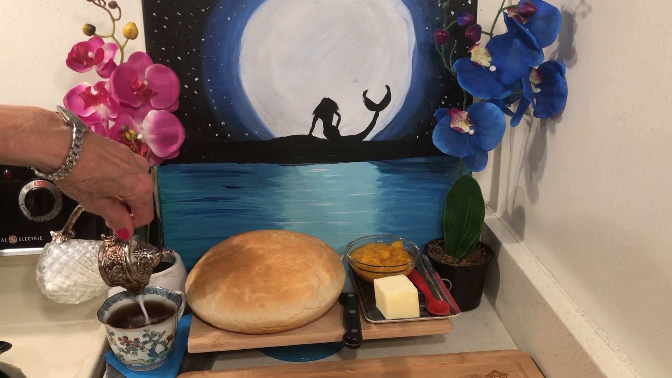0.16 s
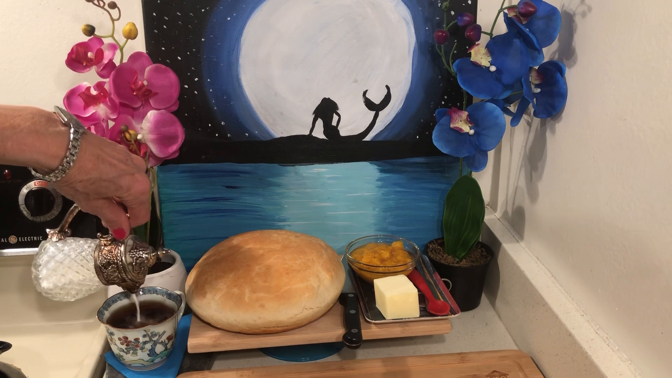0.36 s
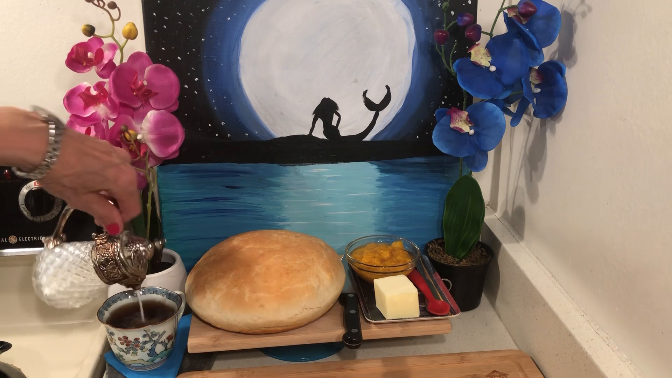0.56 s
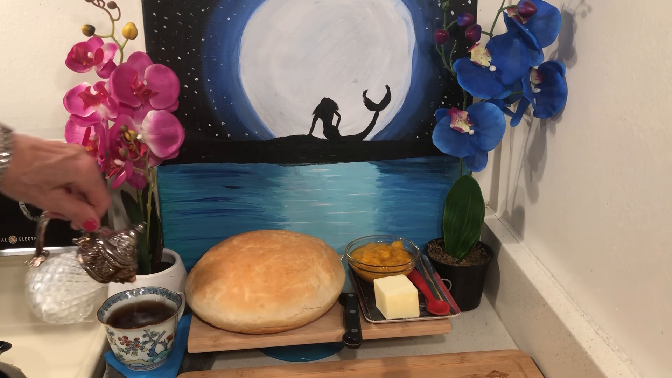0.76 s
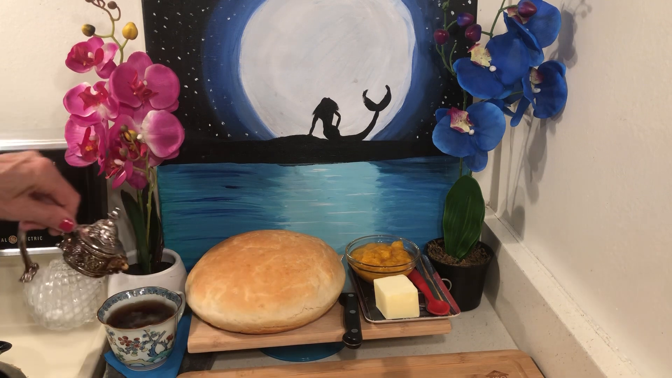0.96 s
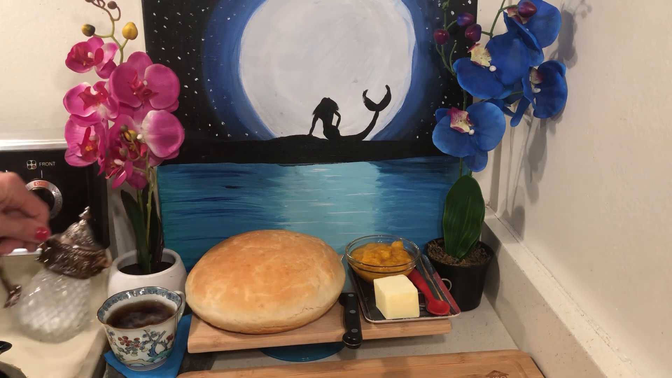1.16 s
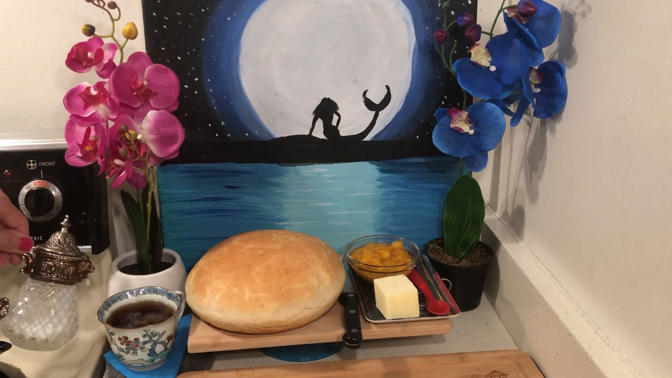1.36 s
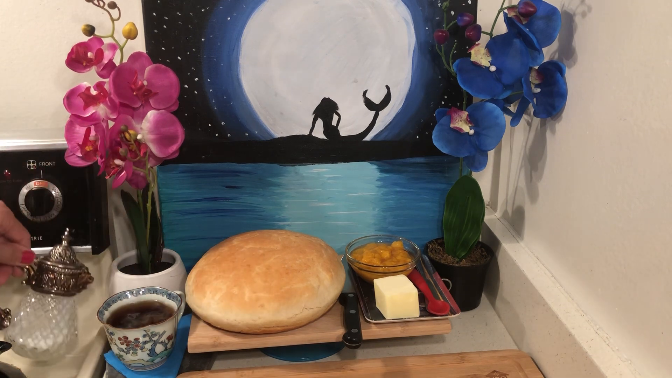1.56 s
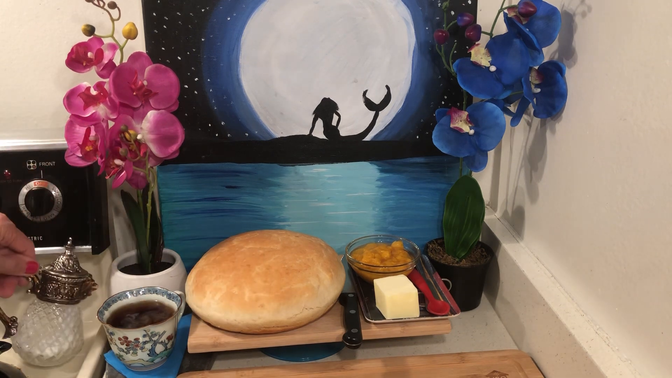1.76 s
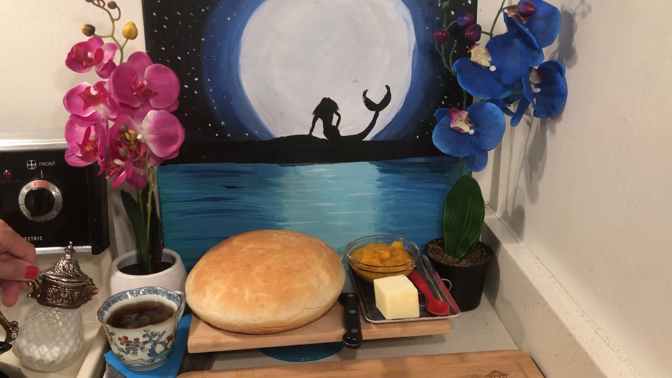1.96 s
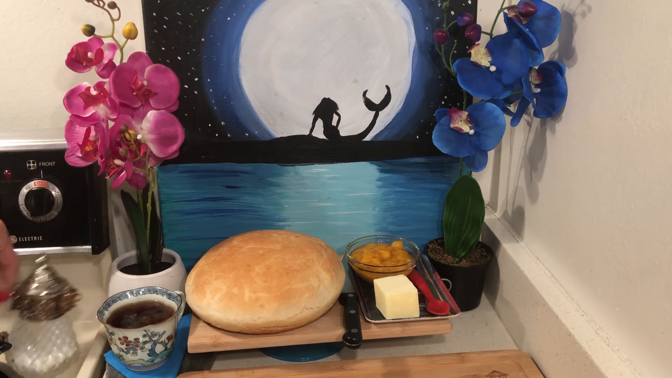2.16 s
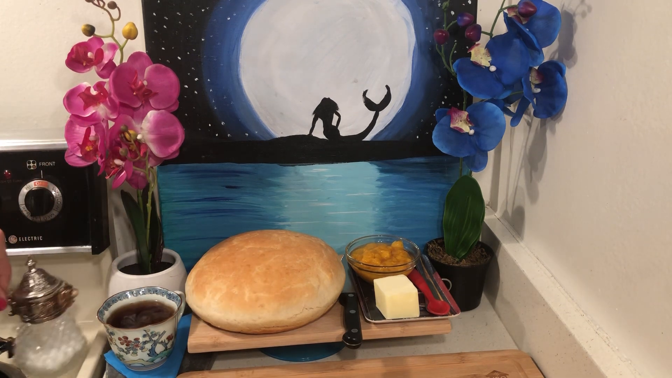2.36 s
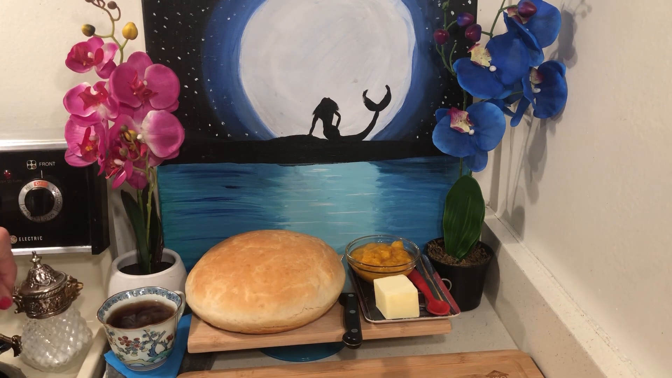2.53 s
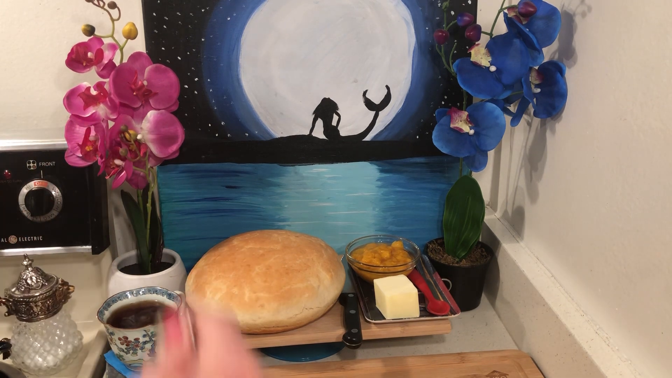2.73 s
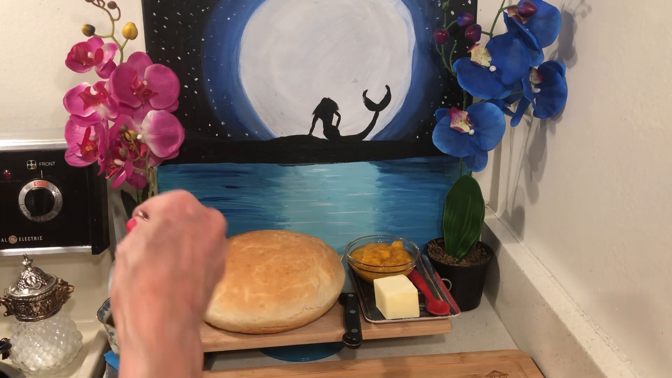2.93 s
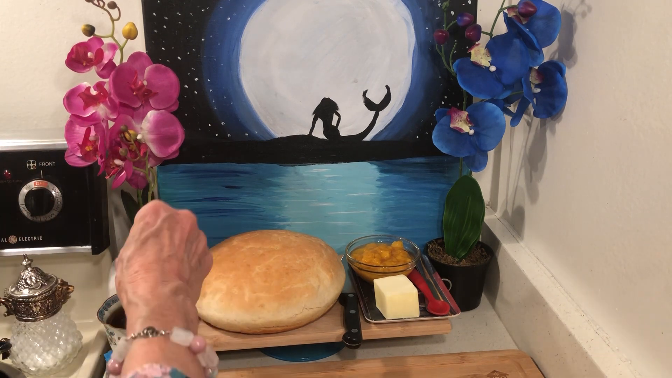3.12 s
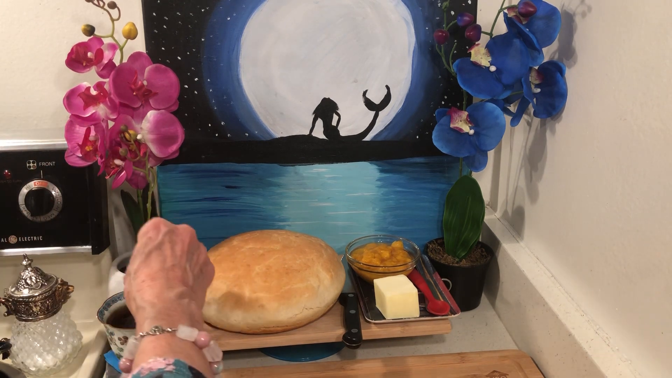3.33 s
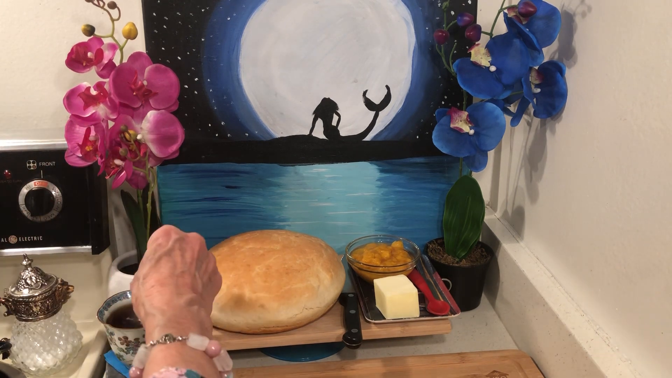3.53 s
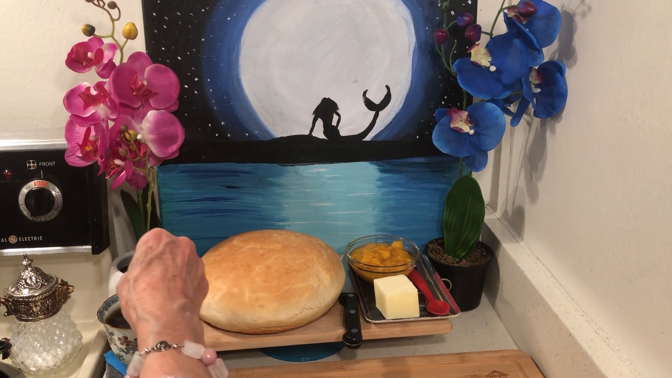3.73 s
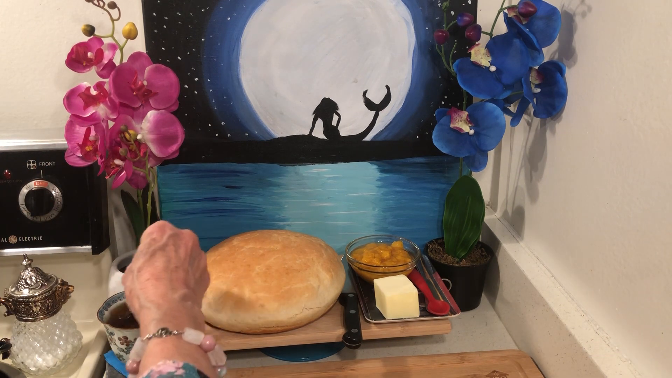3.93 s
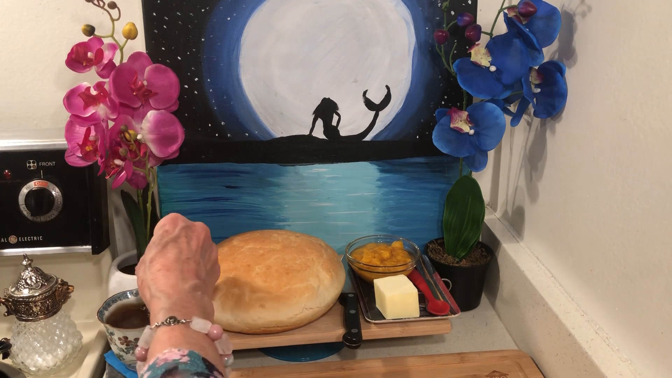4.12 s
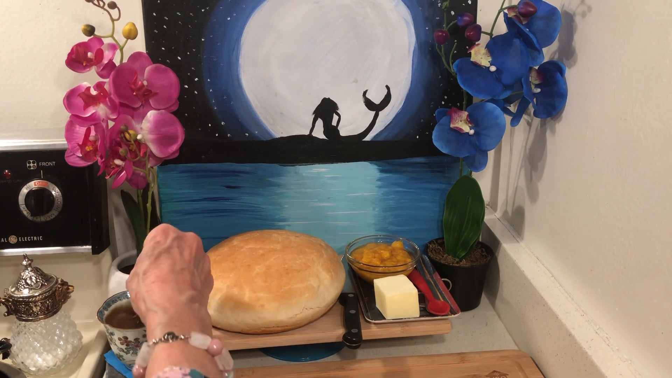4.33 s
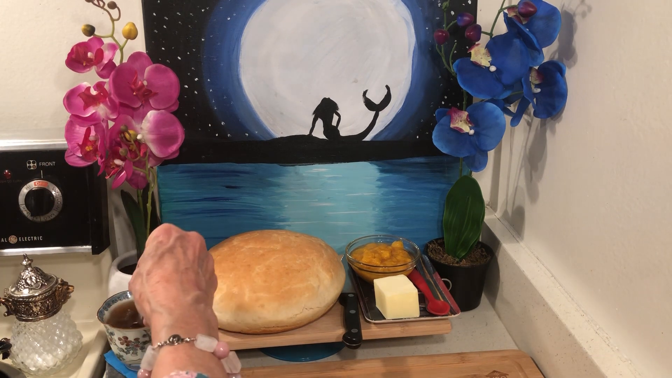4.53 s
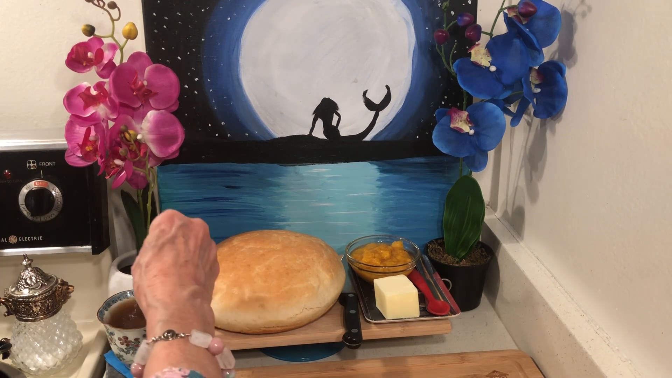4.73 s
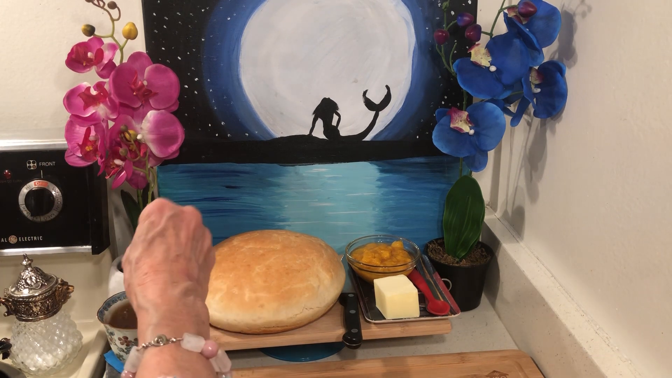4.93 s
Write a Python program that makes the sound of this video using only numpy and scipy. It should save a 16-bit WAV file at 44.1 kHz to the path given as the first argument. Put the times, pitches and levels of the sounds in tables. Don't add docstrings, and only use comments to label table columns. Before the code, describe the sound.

Last drops plink into a cup, then a glass jug with a metal lid clinks, lands hard, rocks and scrapes to rest before a china ring and fine bracelet tinkles.

```python
import sys
import numpy as np
from scipy import signal
from scipy.fft import rfft, irfft
from scipy.io import wavfile
from scipy.ndimage import uniform_filter1d

SR = 44100
rng = np.random.default_rng(int(sys.argv[2]) if len(sys.argv) > 2 else 0)


def invert_db(level):
    return 10 ** (np.asarray(level, dtype=float) / 20)


def output_pcm(signal):
    pcm = np.clip(np.atleast_2d(signal).T, -1, 1) * 32767
    wavfile.write(sys.argv[1], SR, np.round(pcm).astype(np.int16))


N = 224142

# frequency in Hz, level in dB per Hz.
AIR_COLOUR = [(12, -52), (20, -30.5), (95, -1.5), (195, -11), (251, -4), (297, -8), (323, -12.5),
              (416, -6.5), (452, -11), (863, -14.5), (1430, -18), (2500, -26), (4000, -29.5),
              (15200, -44.5), (16500, -51)]
# frequency in Hz, width in Hz, level in dB.
HUM = [(116.3, 6.3, -56.5), (155, 4.1, -63), (274.4, 5, -66.5)]
# frequency in Hz, level in dB.
MOTOR = [(226.1, -56), (414.5, -62)]
# frequency in Hz, T60 in seconds.
ROOM_DECAY = [(100, 1), (300, 0.23), (1000, 0.23), (4000, 0.23), (12000, 0.17)]

# frequency in Hz, level in dB.
LINKS = [(8300, -13), (9400, -6), (9900, -7), (10300, -9), (11400, -6), (12300, -6), (13200, -9),
         (14100, -5), (14900, -11)]
# start in seconds, peak in dB, loudest link in Hz.
TINKLES = [(0.0423, -68, 9610), (0.0972, -60, 9860), (0.2043, -59, 9500), (0.2683, -67, 9400),
           (0.302, -61, 8770), (0.419, -58, 14600), (0.9224, -75, 8750), (0.9744, -75, 9800),
           (1.341, -62, 10000), (3.609, -62, 14100), (3.64, -58, 10000), (3.6925, -52, 10100),
           (3.707, -43, 9900), (3.7848, -64, 9760), (3.8137, -61, 12200), (3.845, -56, 10300),
           (3.9025, -61, 10200), (3.9639, -65, 11500), (3.9809, -60, 11500), (3.9943, -60, 9400),
           (4.0751, -56, 11300), (4.0894, -50, 14900), (4.1854, -56, 9840), (4.3257, -50.5, 14100),
           (4.3525, -59, 9860), (4.3914, -64, 11200), (4.4204, -64, 12200), (4.5501, -66, 9880),
           (4.7052, -54, 9770), (4.9531, -66, 8180)]

# start in seconds, peak in dB, bubble in Hz, splash in dB re the bubble.
DRIPS = [(0.0973, -50, 4020, 5), (0.2022, -50.5, 2310, 3), (0.3026, -46, 2670, 6), (0.4204, -54, 2680, 7),
         (0.4962, -46, 3330, 5), (0.5294, -47.5, 1900, 4), (3.8458, -52, 2710, -3),
         (3.9354, -48.5, 2065, -12)]
# start in seconds, peak in dB, bubble in Hz.
BEADS = [(0.099, -54, 3500), (.212, -60, 13900), (.212, -53.5, 3930), (.303, -63, 4300), (0.495, -53, 4350),
         (.792, -57.5, 6500), (3.939, -54, 4150), (3.983, -56.5, 4290), (3.983, -62, 6800)]

# frequency in Hz, level in dB per Hz.
SLIDE_COLOUR = [(100, -20), (150, 1), (420, 11.5), (1200, 2), (2500, -8.5), (4000, -17), (7000, -24),
                (12000, -42), (16000, -53)]

# frequency in Hz, level in dB, T60 in seconds.
JUG = [(535, -2, .08), (1110, 1, .1), (1500, -4, .05), (1675, 4, .14), (2560, -10, .22), (3125, 4, .065),
       (3145, -8, .25), (4315, -1, .2), (4450, -4, .1), (4680, -9, .16), (5560, 3, .06), (5715, -12, .18),
       (6830, -17, .08), (7246, -16, .13), (8600, -15, .08), (10100, -14, .04), (11420, -20, .09)]
LID = [(4370, -10, .08), (5985, 0, .12), (6150, -5, .04), (6320, -6, .14), (8000, -9, .13), (8300, -8, .04),
       (9577, -17, .09), (10980, -11, .06)]
CUP = [(1325, -19, .4), (1417, -14, .25), (2945, -10, .05), (3349, -4, .24), (3414, -1, .22),
       (5211, -10, .31), (5490, -12, .04), (6005, -12, .2), (6805, -14, .15), (7420, -11, .07),
       (8118, -12, .19), (8195, -8, .17), (9800, -9, .07), (10300, -17, .12), (10710, -16, .1),
       (11460, -14, .1), (12400, -14, .06), (14560, -13, .09)]
FOOT = [(1152, 5.5, 0.039), (1710, -9, 0.039), (3210, -7.5, 0.033), (5700, -12, .02)]
CHARM = [(8210, 0, 0.092)]
LANDING_RING = [(9800, -4, .2), (382, 13, 0.11)]
# start in seconds, peak in dB, softness in dB per octave.
JUG_HITS = [
    (1.3652, -19, -2),
]
LID_HITS = [
    (1.835, -43, 0),
]
CUP_HITS = [
    (3.469, -27.5, 0),
    (3.71, -54, 12),
    (3.85, -56, 14),
    (4.2, -57.5, 16),
]
FOOT_HITS = [(1.756, -42, 0), (2.419, -25, -6), (2.491, -29, -4), (2.5005, -23.5, 5), (2.509, -16, 5.5),
             (2.613, -36, 3)]
CHARM_HITS = [
    (.204, -56, 0),
]
LANDING_RING_HITS = [
    (1.957, -26.5, 0),
]

# frequency in Hz, level in dB per Hz.
KNOCK_COLOUR = [(35, -71), (60, -9), (615, -1.5), (834, -7), (1430, -6), (1850, -9.5), (2040, -9.5),
                (2830, -8.5), (9840, -17.5), (15000, -28), (16500, -57)]
# frequency in Hz, level in dB, T60 in seconds.
COUNTER = [(290, -6, .06), (385, -4, .05), (585, 0, .06), (705, -3, .05), (960, -7, .04), (1165, -2, .05),
           (1445, -4, .05), (1700, -4, .04), (2020, -6, .04), (2285, -7, .03), (3300, -6, .025)]
# start in seconds, peak in dB, hardness
# (treble tilt) in dB per octave, contact time in seconds, lightness (bass cut) in dB per octave.
KNOCKS = [(1.834, -50, 2, 0.011, -5), (1.9505, -14.5, 1.5, 0.0082, 0), (1.954, -11.5, -1.5, 0.0089, 8),
          (1.959, -16.5, -3, 0.0097, 0.5), (1.969, -22, -4, 0.012, -0.5), (2.312, -23, 1.5, 0.0074, 1),
          (2.328, -13, -2.5, 0.0098, 3.5), (2.418, -28.5, -3.5, 0.0087, 10), (2.431, -24, -6, 0.021, 2),
          (2.489, -29, -5, 0.015, 1), (2.501, -27.5, 1, 0.0036, 19), (2.505, -17.5, -5, 0.011, 1),
          (2.612, -39.5, -3, 0.0066, -5.5), (2.66, -32.5, -7.5, 0.014, 8), (2.701, -32.5, -8.5, 0.013, 3),
          (3.468, -32, 5, 0.0052, 28), (3.844, -44, -6, 0.0052, 17),
          (1.364, -26.5, -5.5, 0.01, 5.5), (1.743, -34, -10.5, 0.016, 3), (1.753, -28, -9.5, 0.011, 5.5),
          (2.275, -45, -6, 0.13, 10), (3.41, -35, -8.5, 0.026, 6.5)]
# start in seconds, peak in dB, frequency in Hz.
THUMPS = [(1.957, -44, 74.6), (2.328, -39.5, 161.4), (2.331, -46, 77), (3.419, -59, 61.7)]

AIR_DB = -50.5
SLEEVE_MOVES_S = [1.7, 2.8, 3.12, 3.4]
SLEEVE_HISS_DB = [-4, 0.5, 0.5, -3]
LINK_T60_S = 0.043
SHIVER_START_S, SHIVER_END_S, SHIVER_DB, SHIVER_SAG_DB_PER_S = 3.55, 4.62, -79, -4
BUBBLE_CYCLES = 164
BEAD_T60_S, BEAD_SPLASH_DB = 0.022, 1
SLIDE_START_S, SLIDE_TOP_S, SLIDE_END_S = 2.615, 2.63, 2.79
SLIDE_DB, SLIDE_RISE_DB, SLIDE_SAG_DB_PER_S = -36, -14, -81
SLIPS_PER_S, SLIP_S = 390, 0.0034
GRIP_S = 0.011
JUG_FREE_DB, LID_FREE_DB, CUP_FREE_DB = -9, -7, -1
RING_DB, RING_PER_HARD, RING_PER_LIGHT = -3, -1.24, -1.92
QUIET_EDGE_HZ, LOUD_TOP_DB = 15750, -68


def evened(x):
    return x / np.sqrt(np.mean(x ** 2) + 1e-20)


def peaked(x):
    return x / np.max(abs(x))


def read(points, hz):
    f, value = np.transpose(points)
    return np.interp(np.log(hz + 1), np.log(f + 1), value)


def add(mix, s, sound):
    part = mix[round(s * SR):][:len(sound)]
    part += sound[:len(part)]


def smooth_noise(size, span):
    return evened(uniform_filter1d(rng.standard_normal(size), span))


def coloured(points, size, treble_db=0, bass_db=0):
    octaves = np.log2(np.fft.rfftfreq(size, 1 / SR) + 50)
    treble = treble_db * np.maximum(octaves - np.log2(1800), 0)
    bass = max(bass_db, 0) * np.minimum(octaves - np.log2(800), 0)
    gain = invert_db(read(points, 2 ** octaves - 50) + treble + bass)
    return evened(irfft(rfft(rng.standard_normal(size)) * gain, size))


def ring(modes, size=20000, split_hz=0):
    hz, db, t60 = np.transpose(modes)[:, :, None]
    t = np.arange(size) / SR
    phase, beat, start = rng.random((len(hz), 3)).T[:, :, None]
    pair = 1 + 0.4 * np.sin(2 * np.pi * (split_hz * (0.4 + beat) * t + start))
    waves = invert_db(db - 60 * t / t60) * pair * np.sin(2 * np.pi * (hz * t + phase))
    return waves.sum(axis=0) * (1 - np.exp(-t / 0.0011))


def crack(length, low_hz, top_hz=15000, size=2000):
    t = np.arange(size) / SR
    band = signal.butter(2, [low_hz, min(top_hz, 15500)], "band", fs=SR)
    return peaked(signal.lfilter(*band, rng.standard_normal(size) * np.exp(-t / length)))


def fading(x):
    hz, t, z = signal.stft(x, SR, nperseg=256)
    fall_db = -60 * t / read(ROOM_DECAY, hz)[:, None]
    house = invert_db(-19.0 + 0.38 * fall_db)
    return signal.istft(z * (invert_db(fall_db) + house), SR, nperseg=256)[1][:len(x)]


def room(x, count=3):
    out = np.zeros(N)
    turn = np.pi * 6.5 * np.arange(N) / SR
    for k in range(count):
        taps = np.zeros(SR // 2)
        at = np.arange(40, len(taps) - 10, 10)
        taps[at + rng.integers(0, 10, len(at))] = rng.choice([-1., 1.], len(at))
        tail = fading(taps)
        share = np.sqrt(2 / count) * np.cos(turn + np.pi * k / count)
        out += signal.fftconvolve(x * share, tail / np.linalg.norm(tail))[:N]
    return out


def air():
    frames, hz = N // 512 + 5, np.fft.rfftfreq(2048, 1 / SR)
    a, b, patches = rng.standard_normal((frames, len(hz), 3)).T
    patches = evened(uniform_filter1d(uniform_filter1d(patches, 9, 0), 6, 1))
    hiss_db = np.interp(np.arange(frames) * 512 / SR, SLEEVE_MOVES_S, SLEEVE_HISS_DB)
    top = np.outer(np.clip(np.log2(hz / 5000 + 1e-9), 0, 1), hiss_db)
    z = (a + 1j * b) * invert_db(read(AIR_COLOUR, hz)[:, None] + 2.17 * patches + top)
    out = invert_db(AIR_DB - 3.5) * evened(signal.istft(z, nperseg=2048, noverlap=1536)[1][:N])
    fine = np.fft.rfftfreq(N, 1 / SR)
    for f, width, db in HUM:
        line = rfft(rng.standard_normal(N)) / (1 + (2 * (fine - f) / width) ** 2)
        out += invert_db(db) * evened(irfft(line, N))
    for f, db in MOTOR:
        waver = smooth_noise(N, 6000)
        pitch = f + 1.39 * waver[::-1]
        out += invert_db(db + 2 + 2.0 * waver) * np.sin(2 * np.pi * np.cumsum(pitch) / SR)
    return out


def bracelet():
    hz, db = np.transpose(LINKS)
    out = np.zeros(N)
    for s, peak_db, main_hz in TINKLES:
        shift, chance = rng.standard_normal((len(hz), 2)).T
        others = np.transpose([hz * (1 + 0.015 * shift), db + 3 * chance, np.full(len(hz), 0.03)])
        touch = ring([(main_hz, 0, LINK_T60_S), *others], size=6000, split_hz=76)
        add(out, s, invert_db(peak_db) * peaked(touch))
        add(out, s, invert_db(peak_db - 2.0) * crack(0.01, 5700))
    t = np.arange(N) / SR
    shivering = (t > SHIVER_START_S) * (t < SHIVER_END_S)
    level = invert_db(SHIVER_DB + SHIVER_SAG_DB_PER_S * (t - SHIVER_START_S)) * shivering
    for f, d in zip(hz, db):
        bursts = invert_db(4 * smooth_noise(N, 2000))
        touches = (rng.random(N) < 140 / SR) * rng.standard_normal(N) * level * bursts
        link = ring([(f, d, 0.065), (1.012 * f, d - 2, 0.05), (0.986 * f, d - 3, 0.04)], size=3000)
        out += signal.oaconvolve(touches, link)[:N]
    return out


def drips():
    out, t = np.zeros(N), np.arange(3000) / SR
    drops = [(s, db, hz, BUBBLE_CYCLES / hz, splash_db) for s, db, hz, splash_db in DRIPS]
    drops += [(*bead, BEAD_T60_S, BEAD_SPLASH_DB) for bead in BEADS]
    for s, db, hz, t60, splash_db in drops:
        sound = invert_db(-60 * t / t60) * np.sin(2 * np.pi * hz * (t + 1.06 * t ** 2))
        splash = crack(0.005, 0.95 * hz, 1.5 * hz) + 0.45 * crack(0.002, hz)
        sound[:2000] += invert_db(splash_db) * splash / 2
        add(out, s, invert_db(db) * sound)
    return out


def slide():
    t = np.arange(SLIDE_START_S, SLIDE_END_S, 1 / SR)
    gathering_db = SLIDE_RISE_DB * (SLIDE_TOP_S - t) / (SLIDE_TOP_S - SLIDE_START_S)
    sagging_db = SLIDE_SAG_DB_PER_S * (t - SLIDE_TOP_S)
    level_db = SLIDE_DB + np.where(t < SLIDE_TOP_S, gathering_db, sagging_db)
    grains = evened(invert_db(2.5 * smooth_noise(len(t), 150)))
    slips = (rng.random(len(t)) < SLIPS_PER_S / SR) * rng.exponential(1, len(t))
    slips = uniform_filter1d(slips, size=60)
    catches = signal.lfilter([1], [1, -np.exp(-1 / (SLIP_S * SR))], slips)
    grains = evened(grains + 1.05 * catches)
    rub = coloured(SLIDE_COLOUR, len(t)) * grains * signal.windows.tukey(len(t), 0.3)
    out = np.zeros(N)
    add(out, t[0], invert_db(level_db) * rub)
    return out


def clinks():
    out = np.zeros(N)
    blow = np.exp(-(np.arange(20000) / (GRIP_S * SR)) ** 2)
    objects = [(JUG, JUG_HITS, 50, JUG_FREE_DB),
               (LID, LID_HITS, 60, LID_FREE_DB),
               (CUP, CUP_HITS, 25, CUP_FREE_DB),
               (FOOT, FOOT_HITS, 60, LID_FREE_DB),
               (CHARM, CHARM_HITS, 20, CUP_FREE_DB),
               (LANDING_RING, LANDING_RING_HITS, 40, CUP_FREE_DB)]
    for modes, hits, split_hz, free_db in objects:
        grip = invert_db(free_db) + (1 - invert_db(free_db)) * blow
        for s, db, soft_db in hits:
            softness = max(soft_db, 0)
            struck = [(hz, d - softness * abs(np.log2(hz / 3400)), t60) for hz, d, t60 in modes]
            add(out, s, invert_db(db - 4) * peaked(grip * ring(struck, split_hz=split_hz)))
    return out


def knocks():
    rough, body, t = np.zeros(N), np.zeros(N), np.arange(16384) / SR
    for s, db, treble_db, contact, bass_db in KNOCKS:
        rise = 1 - np.exp(-t / (0.043 * contact))
        fall = np.exp(-t / contact)
        blow = peaked(coloured(KNOCK_COLOUR, len(t), treble_db, bass_db) * rise * fall)
        lumps = invert_db(0.91 * smooth_noise(len(t), 130))
        scatter = fading(coloured(KNOCK_COLOUR, len(t), treble_db, bass_db)) * (1 - fall) * lumps
        fill = invert_db(-18.0) * np.sqrt(contact / 0.0061)
        add(rough, s, invert_db(db) * (blow + fill * scatter))
        spot = np.array(COUNTER) * [rng.uniform(1.0, 1.01), 1, 0.8]
        ring_db = RING_DB + RING_PER_HARD * treble_db + RING_PER_LIGHT * bass_db
        rung = signal.fftconvolve(blow[:200], ring(spot, size=6000))
        add(body, s, invert_db(db + ring_db) * peaked(rung))
    for s, db, hz in THUMPS:
        flex = np.sin(2 * np.pi * hz * t) * t ** 2 * np.exp(-t / 0.024)
        add(rough, s, invert_db(db) * peaked(flex))
    return rough, body


def scene():
    background = air()
    light = bracelet() + drips()
    rings = clinks()
    rough, body = knocks()
    heavy = body + slide()
    wet = room(invert_db(-5.5) * heavy + invert_db(-10.0) * light)
    wet += invert_db(-8) * room(rings)
    return (rough + invert_db(-4.0) * heavy + invert_db(-0.5) * light + rings + wet + background)[None]


def roll_off(x):
    return signal.sosfilt(signal.butter(12, 16780, fs=SR, output="sos"), x)


def record(dry):
    window = ("kaiser", 8)
    edge = signal.firwin(255, 16500, window=window, fs=SR)
    high = signal.firwin(511, QUIET_EDGE_HZ, window=window, fs=SR, pass_zero=False)
    top = signal.oaconvolve(dry, high[None], "same")
    quiet = uniform_filter1d(top ** 2, 400) < invert_db(2 * LOUD_TOP_DB)
    kept = dry - top * uniform_filter1d(1. * quiet, 200)
    return roll_off(signal.oaconvolve(kept, edge[None], "same"))


dry = scene()
out = record(dry)
output_pcm(out)
```